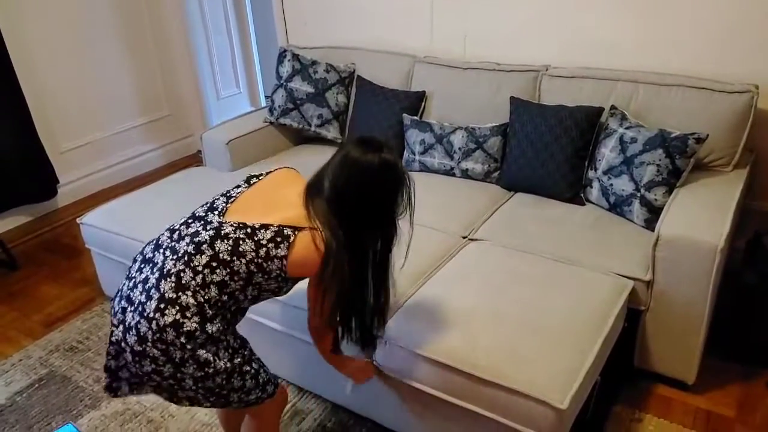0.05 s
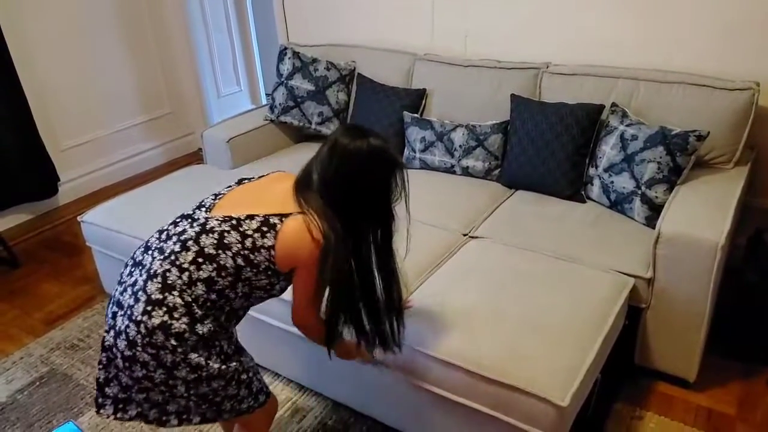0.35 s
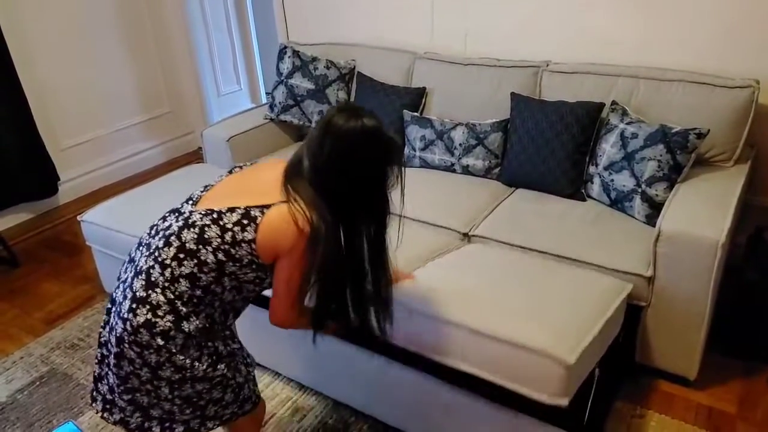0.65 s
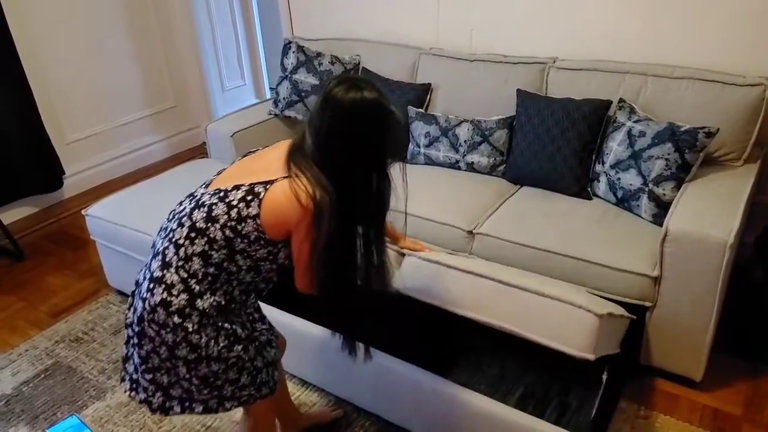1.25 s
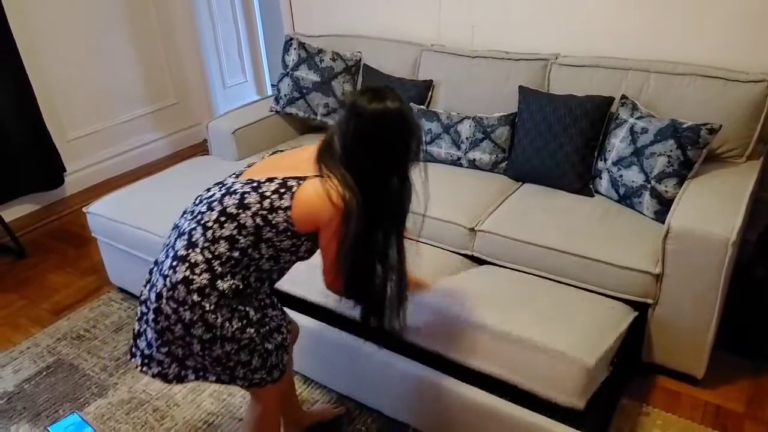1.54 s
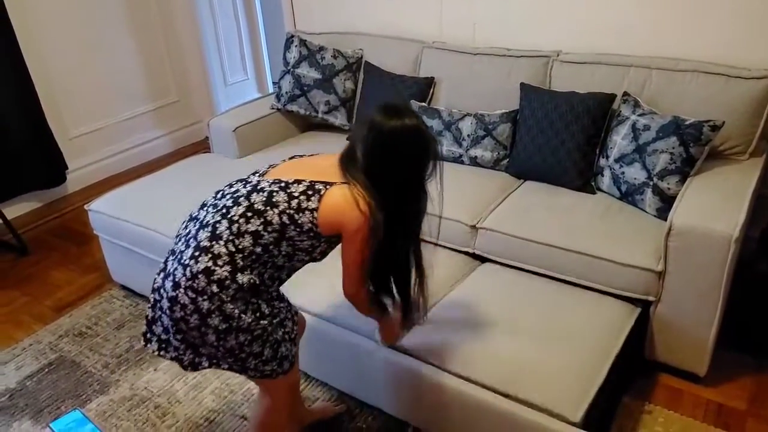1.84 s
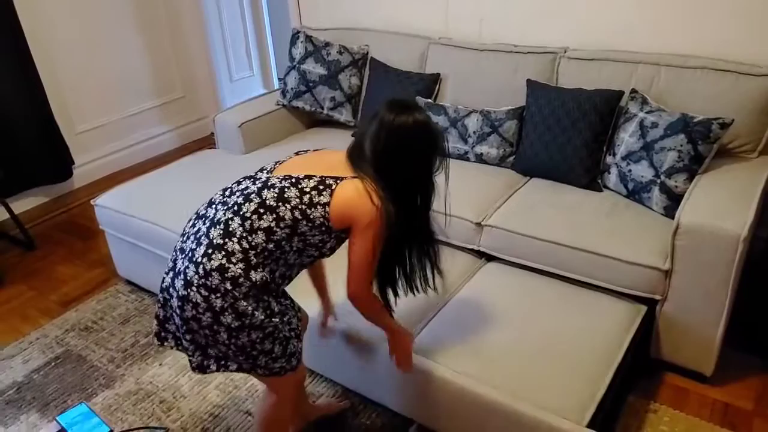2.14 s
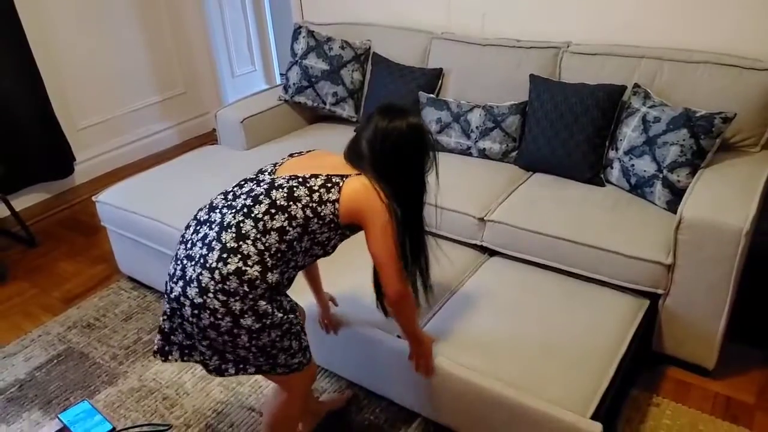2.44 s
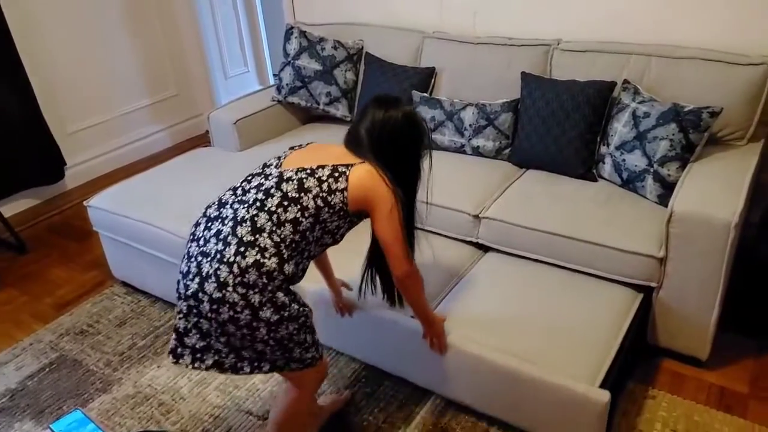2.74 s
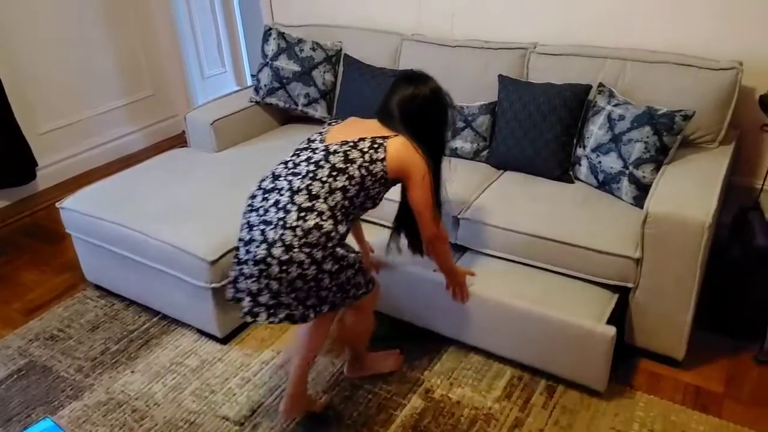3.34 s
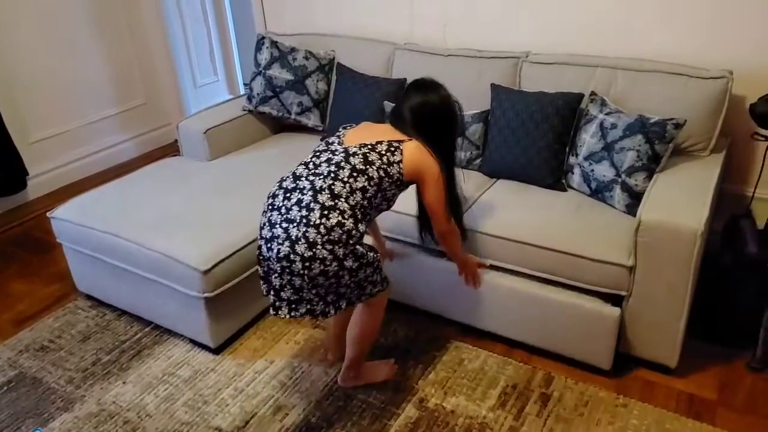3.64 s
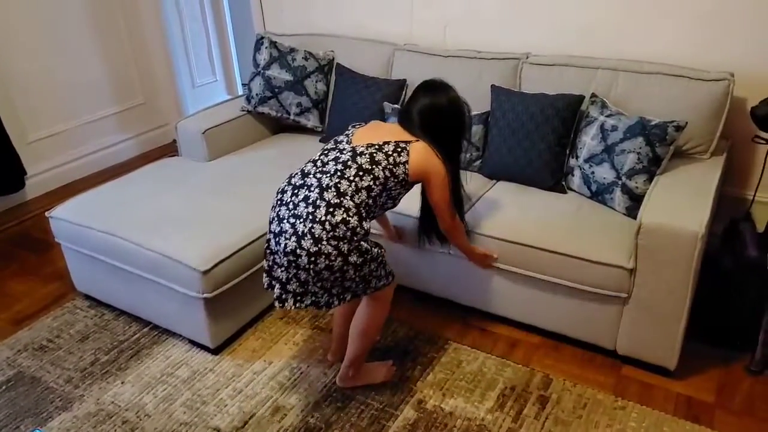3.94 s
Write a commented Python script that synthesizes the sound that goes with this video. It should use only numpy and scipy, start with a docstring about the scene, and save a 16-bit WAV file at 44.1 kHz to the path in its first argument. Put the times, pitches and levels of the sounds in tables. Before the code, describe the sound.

A pull-out sofa bed folding away with metal clacks, heavy thuds and a sliding rumble.

```python
"""A sofa's pull-out bed is put away in a quiet living room. First a hand knocks the hollow drawer front,
cloth rubs and joints creak. The padded platform is lifted on its clacking steel linkage, and the frame
grumbles. The platform swings down past the cushions and lands in its drawer with a cluster of clunks
as a steel catch snaps shut. Last, the drawer rumbles in over the floor and slams against its stop."""
import sys
import numpy as np
from scipy import signal
from scipy.io import wavfile

SR = 44100
rng = np.random.default_rng(int(sys.argv[2]) if len(sys.argv) > 2 else 0)


def store_wav(level_fs):
    """Save 16-bit WAV to argv[1]."""
    pcm = np.round(np.clip(np.atleast_2d(level_fs), -1, 1) * 32767)
    wavfile.write(sys.argv[1], SR, pcm.T.astype(np.int16))


N = 176400
TIME = np.arange(N) / SR
BANDS_HZ = 31.25 * 2 ** (np.arange(19) / 2)

# A colour gives the level in each band of pitch. A ring_s is the time a sound takes to fade by 60 dB.
# colour of the still room: pitch_hz, level_db
ROOM_COLOUR = [(30, -92), (75, -77.5), (200, -76.5), (500, -83.5), (1000, -90.5), (2500, -91.5),
               (4200, -96), (6200, -102.5), (15000, -93.5)]
# thin background hiss: pitch_hz, width_hz, level_db
ROOM_HISS = (8500, 540, -99)
# hard contacts of linkage and frame: start_s, level_db, lowest_hz, highest_hz, tick_db, rise_s
LINKAGE_HITS = [(.245, -64.5, 480, 1470, -35, 0.0039), (0.259, -55, 664, 1340, -30, 0.015),
                (.820, -60, 840, 2460, -26, 0.0057), (0.841, -60, 540, 1530, -25, 0.0033),
                (0.873, -67.5, 600, 1940, -25, 0.003), (1.405, -66.5, 200, 1230, -29, 0.0035),
                (1.522, -65.5, 880, 2770, -24, 0.0018), (1.55, -56.5, 145, 2370, -24, 0.0041),
                (1.598, -51, 483, 3030, -12, 0.0028), (1.629, -54, 260, 2730, -12, 0.002),
                (1.651, -58.5, 151, 1490, -14, 0.00078), (2.103, -38, 128, 910, -16, 0.001),
                (2.112, -50, 200, 2490, -8, 0.00082), (2.132, -46.5, 275, 7900, 0.5, 0.0012),
                (2.147, -43, 300, 2530, -12, 0.0014), (2.170, -40.5, 600, 2900, -26, 0.001),
                (2.1755, -42.5, 1000, 5170, -4.5, 0.00026), (2.985, -65, 595, 1290, -38, 0.0076),
                (3.291, -59.5, 700, 1840, -36, 0.0082), (3.985, -53, 342, 1480, -32, 0.0029)]
# colour of a knock in the frame and room: pitch_hz, level_db
KNOCK_COLOUR = [(125, 2), (380, -0.5), (800, -6.5), (1300, -4.5), (2500, -6.5), (4400, -4.5), (5800, -10),
                (7500, -11.5), (11500, -19.5), (15000, -39)]
# how long a knock lingers: pitch_hz, ring_s
KNOCK_FADE = [(60, 0.45), (300, 0.45), (1000, 0.4), (3000, 0.33), (7000, 0.35), (14000, 0.36)]
# tones of the steel bars: pitch_hz, level_db, ring_s
STEEL_TONES = [(377, 6.5, 0.25), (530.2, 2, 0.34), (645, 3, .38), (762, -4.5, 0.25), (1365, -0.5, 0.37),
               (1600, -2.5, 0.14), (1934, -5, 0.15), (2628, -2.5, 0.34), (4110, -4, 0.21), (4760, -8, 0.44),
               (7090, -7, 0.38)]
# tones of the drawer front: pitch_hz, level_db, ring_s
FRONT_TONES = [(580, -60.5, .35), (1121, -56, 0.18), (1210, -64, .2)]
# tones of the platform's frame lifting off: pitch_hz, level_db, ring_s
LIFT_TONES = [(931, -59, .3), (1400, -70.5, 0.57), (2250, -69, 0.22)]
# tone of the steel catch: pitch_hz, level_db, ring_s
CATCH_TONES = [(4140, -29, 0.017)]
# cloth rubbing on cloth: middle_s, half_length_s, level_db
CLOTH_RUBS = [(0.505, 0.028, -82), (0.63, 0.16, -86)]
# colour of that rubbing: pitch_hz, level_db
CLOTH_COLOUR = [(250, -7), (550, 5.5), (1200, -2), (3800, -11.5), (14000, -26)]
# joints creaking under load: middle_s, half_length_s, pitch_hz, level_db
JOINT_CREAKS = [(0.648, 0.042, 1167, -81), (0.765, 0.024, 398, -66), (2.564, 0.031, 658, -74)]
# the padded platform bumping and landing: start_s, level_db, muffled_above_hz
PLATFORM_BLOWS = [(.84, -44, 67), (.888, -37.5, 39), (1.215, -52.5, 780), (1.655, -40, 390),
                  (1.695, -39, 130), (1.768, -43.5, 180), (2.104, -17.5, 400), (2.124, -23, 170),
                  (2.192, -21.5, 140), (2.249, -18.5, 67)]
# low tones of the platform: pitch_hz, level_db, ring_s
PLATFORM_TONES = [(62.8, -5, 0.15), (73.5, -11.5, 0.47), (109.4, -7, 0.43), (127.3, -3, 0.14),
                  (151, -14.5, 0.19), (214, -10, 0.14)]
# how loudly the moving frame and drawer rumble: time_s, level_db
RUMBLE_LEVELS = [(0, -85), (1.1, -83), (1.37, -78.5), (1.57, -67), (1.8, -68), (2.04, -76.5), (2.1, -57),
                 (2.4, -63.5), (2.55, -68.5), (2.9, -67.5), (3.02, -62.5), (3.12, -63.5), (3.19, -57.5),
                 (3.4, -60), (3.55, -63.5), (3.65, -50.5), (3.85, -56)]
# colour of the rumble: pitch_hz, level_db
RUMBLE_COLOUR = [(30, -11), (50, 3.5), (100, 4), (170, -5.5), (360, -6), (700, -12.5), (1400, -22.5),
                 (2800, -41), (6000, -43)]
# pitches at which the runners scrape: pitch_hz, width_hz, level_db
RUNNER_PEAKS = [(1090, 140, -21.5), (1733, 170, -23)]
# the platform's edge sliding past the cushions: middle_s, half_length_s, level_db
SLIDE_SWELL = (1.994, 0.086, -79.5)
# pitches in the hiss of that slide: pitch_hz, width_hz, level_db
SLIDE_HISS = [(2260, 290, 1), (3680, 490, -1), (7500, 5400, -6.5)]
# the drawer bumping along and hitting home: start_s, level_db, muffled_above_hz
DRAWER_BLOWS = [(2.657, -38, 173), (2.698, -35.5, 78), (2.955, -39.5, 55), (3.172, -40, 136),
                (3.595, -39.5, 180), (3.663, -19.5, 460), (3.689, -18.5, 182), (3.718, -15, 136)]
# low tones of the drawer: pitch_hz, level_db, ring_s
DRAWER_TONES = [(49.2, -5, 0.3), (66.4, -1, 0.2), (98.9, -8.5, 0.38), (135, -9.5, 0.16), (197.2, -1, 0.11),
                (311.6, -15, 0.28)]
# the drawer cracking against its wooden stop: start_s, level_db
STOP_CRACKS = [(3.6624, -38.5), (3.671, -42), (3.714, -47.5)]
# colour of that crack: pitch_hz, level_db
WOOD_COLOUR = [(50, 5), (130, 8.5), (300, 4.5), (500, -3), (1000, -9.5), (2100, -1.5), (4200, -3),
               (5600, -14.5), (8500, -18), (14000, -36)]


def from_db(db):
    """Turn decibels into a number to multiply by."""
    return 10 ** (np.asarray(db) / 20)


def at_hz(table, hz):
    """Read a table at any pitch, blending between its rows."""
    pitches, values = np.transpose(table)
    return np.interp(np.log(hz), np.log(pitches), values)


def keep_side(sound, hz, side, order):
    """Keep the "low" or "high" side of a pitch; a higher order cuts more steeply."""
    return signal.sosfilt(signal.butter(order, hz, side, fs=SR, output="sos"), sound + 1e-18)


def band(sound, hz):
    """Keep half an octave around a pitch, scaled so that white noise keeps its strength."""
    low_hz, high_hz = hz / 2 ** .25, hz * 2 ** .25
    band_filter = signal.butter(3, [low_hz, high_hz], "band", fs=SR, output="sos")
    return signal.sosfilt(band_filter, sound + 1e-18) * np.sqrt(SR / 2 / (high_hz - low_hz))


def coloured_noise(colour, jolts=0):
    """Steady noise with the given band levels; any jolts are shared by all bands."""
    return sum(from_db(at_hz(colour, hz)) * band(rng.standard_normal(N) + jolts, hz) for hz in BANDS_HZ)


def pitched_noise(peaks):
    """Noise gathered around a few pitches, each at its own level."""
    out = np.zeros(N)
    for hz, width_hz, db in peaks:
        noise = signal.lfilter(*signal.iirpeak(hz, hz / width_hz, fs=SR), rng.standard_normal(N))
        out += from_db(db) * np.sqrt(SR / np.pi / width_hz) * noise
    return out


def ring(tones):
    """One second of a struck object's fading tones, every other one flipped upside down."""
    t = TIME[:SR]
    return sum((-1) ** k * from_db(db - 60 * t / ring_s) * np.sin(2 * np.pi * hz * t)
               for k, (hz, db, ring_s) in enumerate(tones))


def fade_in(rise_s):
    """A one-second curve that softens the start of a hit."""
    return 1 - np.exp(-TIME[:SR] / rise_s)


def swell(middle_s, half_length_s, db=0):
    """A smooth rise and fall of level."""
    return from_db(db) * np.exp(-((TIME - middle_s) / half_length_s) ** 2 / 2)


def add(out, start_s, sound):
    """Mix a sound in at the given time."""
    start = int(start_s * SR)
    out[start:start + len(sound)] += sound[:max(N - start, 0)]


def still_room():
    """The room's faint, low murmur with a thin hiss on top."""
    return coloured_noise(ROOM_COLOUR) + pitched_noise([ROOM_HISS])


def knock(colour, click_db=7, crack_db=4, crack_s=0.00086):
    """A click, a short crack, then the frame and room ringing on, each band fading at its own pace."""
    t, out = TIME[:SR], np.zeros(SR)
    crack = 1 + from_db(crack_db) * np.exp(-t / crack_s)
    for hz in BANDS_HZ:
        burst = rng.standard_normal(SR) * crack * from_db(-60 * t / at_hz(KNOCK_FADE, hz))
        burst[0] += from_db(click_db)
        out += from_db(at_hz(colour, hz)) * band(burst, hz)
    return out


def steel_ring(bars=3, pitch_spread=.012, spread_db=2.5, level_db=-7.5):
    """Several similar steel bars ring together, so each tone is a cluster of close pitches."""
    tones = [(hz * (1 + pitch_spread * rng.standard_normal()), db + rng.normal(0, spread_db), ring_s)
             for hz, db, ring_s in STEEL_TONES for _ in range(bars)]
    return from_db(level_db) * ring(tones) / np.sqrt(bars)


def linkage_clacks():
    """Each clack rings frame and steel, with its own pitch range and sharpness of attack."""
    out = np.zeros(N)
    for start_s, db, low_hz, high_hz, tick_db, rise_s in LINKAGE_HITS:
        hit = (knock(KNOCK_COLOUR) + steel_ring()) * fade_in(rise_s)
        body = keep_side(hit, low_hz, "high", order=2)
        body = keep_side(body, high_hz, "low", order=3)
        tick = from_db(tick_db) * keep_side(hit, high_hz, "high", order=3)
        add(out, start_s, from_db(db) * (body + tick))
    return out


def ringing_parts(front_s=.257, lift_s=.828, catch_s=2.1755):
    """The knocked drawer front, the lifted frame and the snapping catch each ring once."""
    out = np.zeros(N)
    for start_s, tones in ((front_s, FRONT_TONES), (lift_s, LIFT_TONES), (catch_s, CATCH_TONES)):
        add(out, start_s, ring(tones) * fade_in(rise_s=.001))
    return out


def cloth_rubs():
    """Cloth rubs on cloth in soft swells of noise."""
    return coloured_noise(CLOTH_COLOUR) * sum(swell(*rub) for rub in CLOTH_RUBS)


def joint_creaks(width_hz=15):
    """Each loaded joint rubs briefly at one narrow pitch."""
    return sum(pitched_noise([(hz, width_hz, db)]) * swell(middle_s, half_length_s)
               for middle_s, half_length_s, hz, db in JOINT_CREAKS)


def thuds(blows, tones, room_db=-27):
    """Cushioned blows ring the low tones of a heavy part, and the room with them."""
    out = np.zeros(N)
    for start_s, db, muffled_above_hz in blows:
        body = ring(tones) + from_db(room_db) * knock(KNOCK_COLOUR)
        add(out, start_s, from_db(db) * keep_side(body, muffled_above_hz, "low", order=2))
    return out


def rumble(jolts_per_s=54, jolt_db=-5.5, jolt_top_hz=1770, waver_db=4):
    """Runners and joints grind as they move: a low roar with small jolts, and a scrape in fits."""
    jolts = (rng.random(N) < jolts_per_s / SR) * rng.standard_normal(N) * np.sqrt(SR / jolts_per_s)
    jolts = keep_side(jolts, jolt_top_hz, "low", order=2)
    grind = coloured_noise(RUMBLE_COLOUR, from_db(jolt_db) * jolts)
    for peak in RUNNER_PEAKS:
        scrape = pitched_noise([peak])
        waver = np.interp(np.arange(N), np.linspace(0, N, 60), rng.standard_normal(60))
        grind += scrape * from_db(waver_db * waver)
    return grind * from_db(np.interp(TIME, *np.transpose(RUMBLE_LEVELS)))


def with_runner_ring(shaking, ring_db=-27):
    """The rumble and the cracks at the stop carry a faint ring from the steel runners."""
    steel = steel_ring()
    ringing = signal.fftconvolve(shaking, steel / np.linalg.norm(steel))[:N]
    return shaking + from_db(ring_db) * ringing


def platform_slide():
    """The platform's edge slides down past the cushions with a hollow hiss."""
    return pitched_noise(SLIDE_HISS) * swell(*SLIDE_SWELL)


def drawer_stop(wood_top_hz=3620, ripple_db=3, tick_db=-13.5):
    """The drawer's two sides hit home in turn and bounce once; above the wood's range is a faint tick."""
    cracks = np.zeros(N)
    for start_s, db in STOP_CRACKS:
        add(cracks, start_s, from_db(db) * knock(WOOD_COLOUR))
    wood_filter = signal.cheby1(6, ripple_db, wood_top_hz, fs=SR, output="sos")
    tick = from_db(tick_db) * keep_side(cracks, wood_top_hz, "high", order=4)
    return signal.sosfilt(wood_filter, cracks) + tick


def scene():
    """All the sofa's sounds over the quiet of the room, in one channel."""
    frame = linkage_clacks() + ringing_parts() + cloth_rubs() + joint_creaks()
    platform = thuds(PLATFORM_BLOWS, PLATFORM_TONES) + platform_slide()
    drawer = thuds(DRAWER_BLOWS, DRAWER_TONES) + with_runner_ring(rumble() + drawer_stop())
    return (still_room() + frame + platform + drawer)[None]


def record(dry, lowest_hz=40.7, highest_hz=15800):
    """Thin out the deepest bass and steeply cut the highest treble."""
    trimmed = keep_side(dry, lowest_hz, "high", order=2)
    return signal.sosfilt(signal.ellip(10, .1, 80, highest_hz, fs=SR, output="sos"), trimmed)


dry = scene()
out = record(dry)
store_wav(out)
```